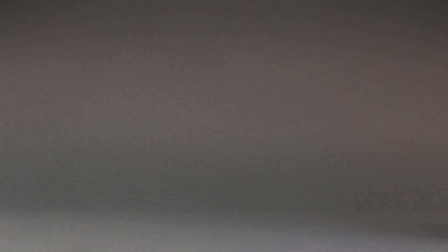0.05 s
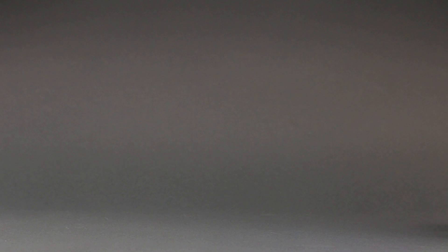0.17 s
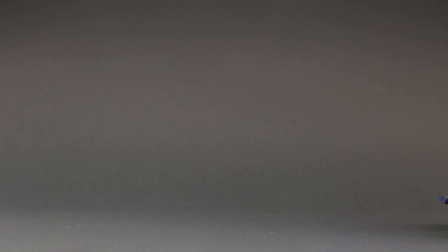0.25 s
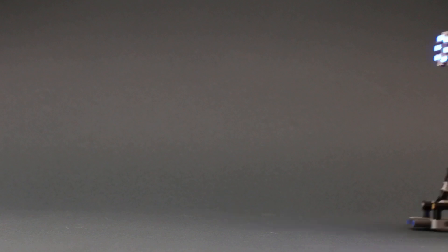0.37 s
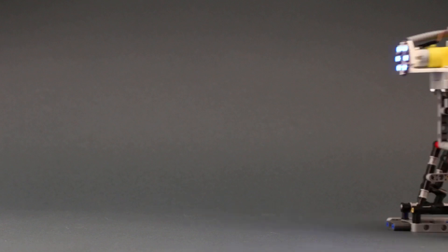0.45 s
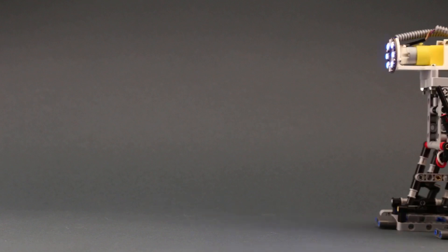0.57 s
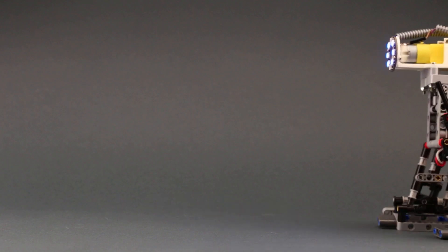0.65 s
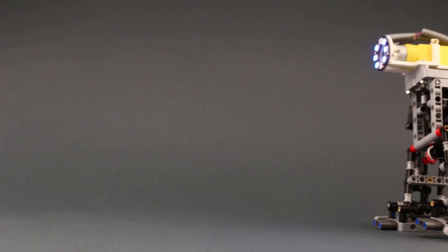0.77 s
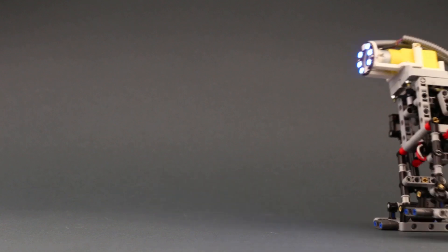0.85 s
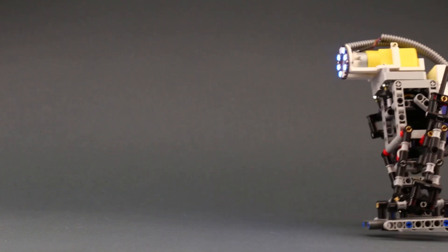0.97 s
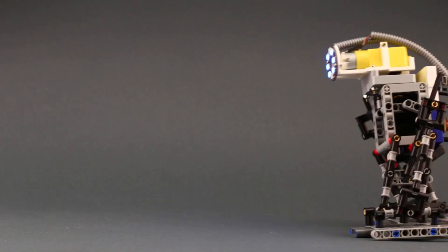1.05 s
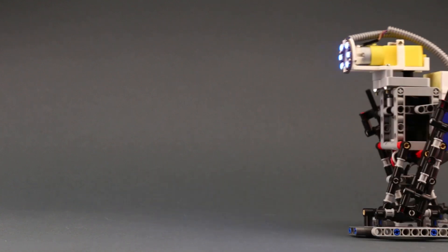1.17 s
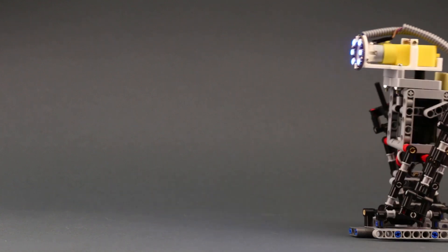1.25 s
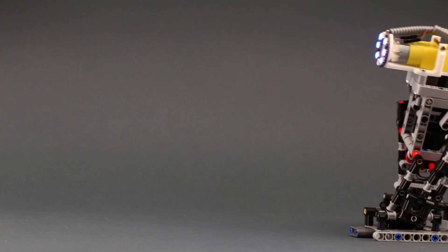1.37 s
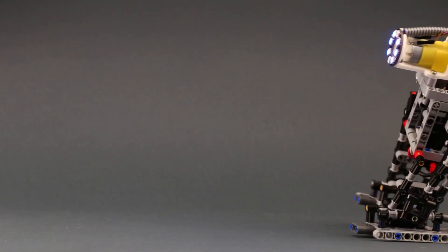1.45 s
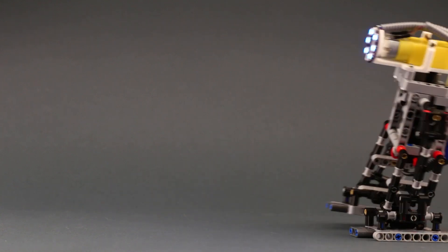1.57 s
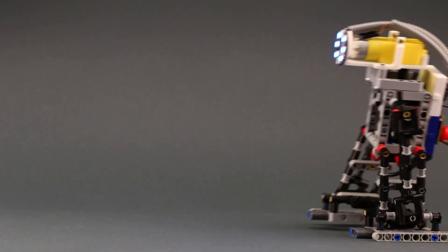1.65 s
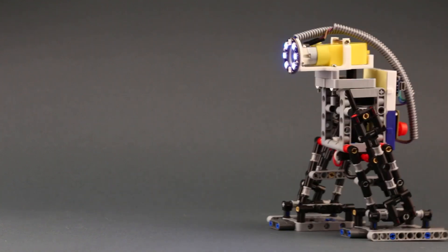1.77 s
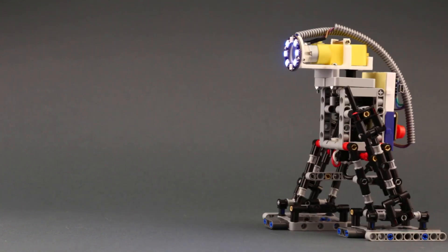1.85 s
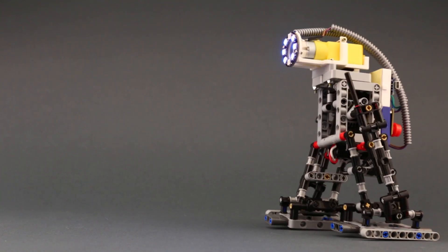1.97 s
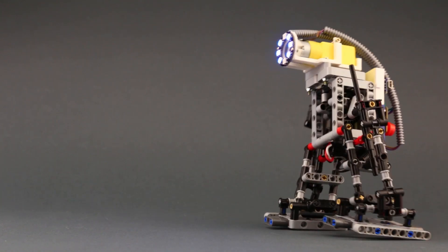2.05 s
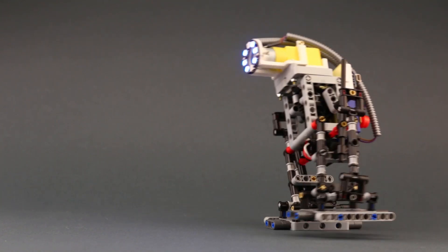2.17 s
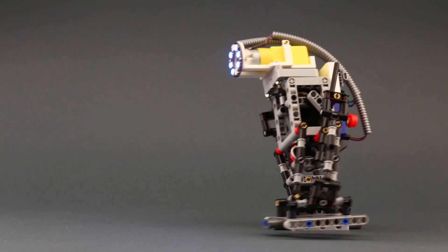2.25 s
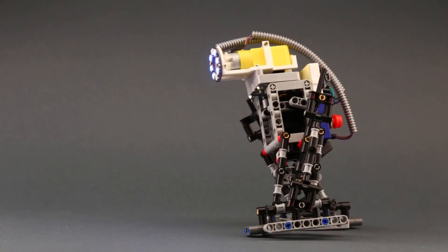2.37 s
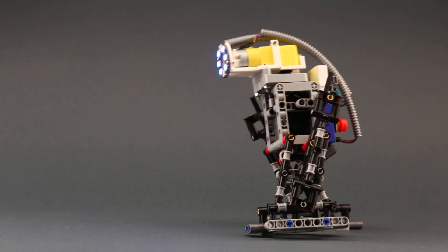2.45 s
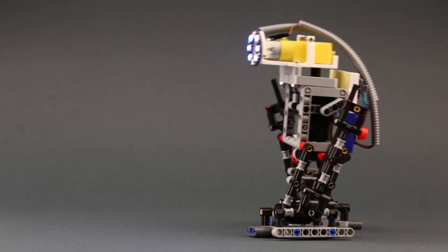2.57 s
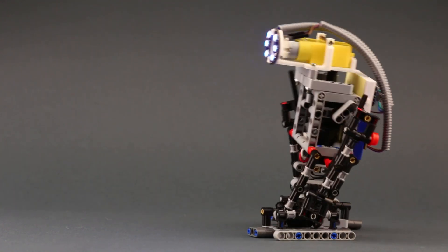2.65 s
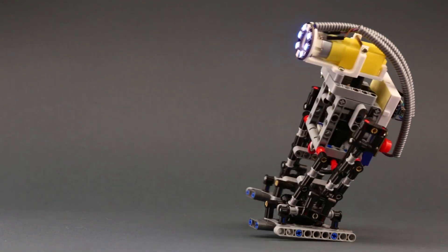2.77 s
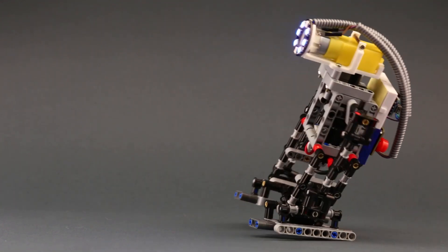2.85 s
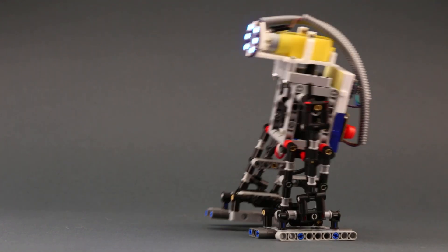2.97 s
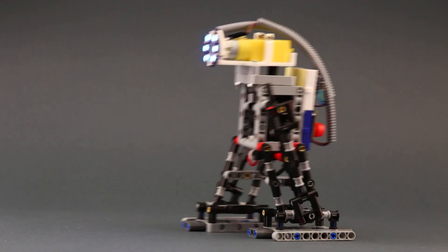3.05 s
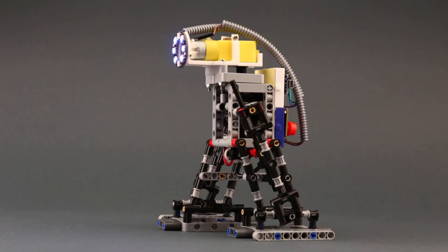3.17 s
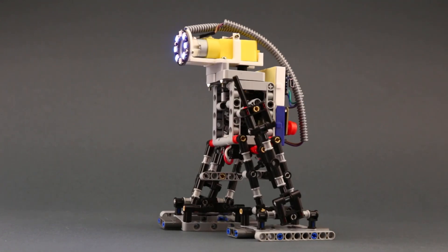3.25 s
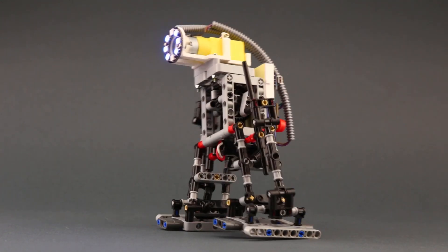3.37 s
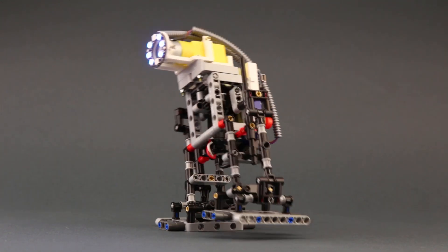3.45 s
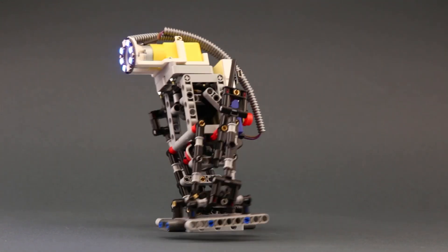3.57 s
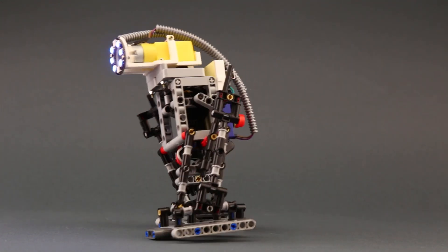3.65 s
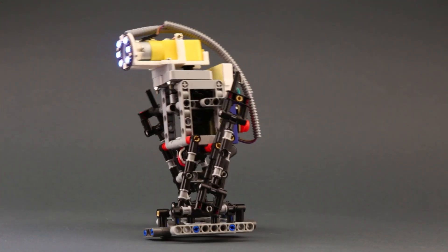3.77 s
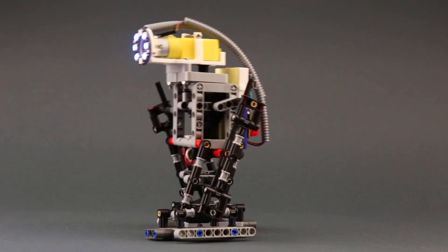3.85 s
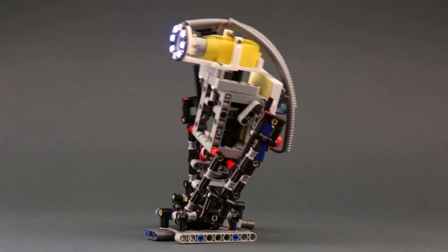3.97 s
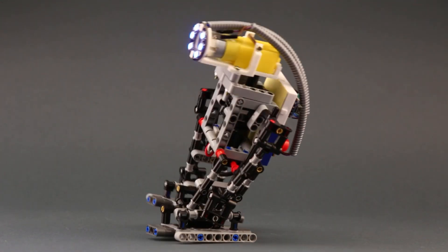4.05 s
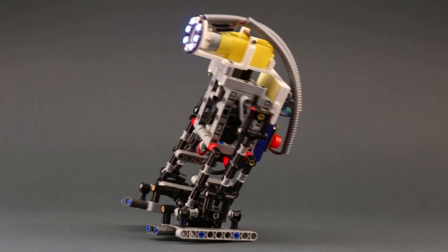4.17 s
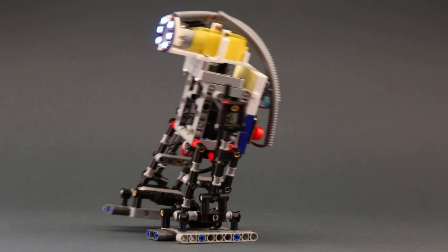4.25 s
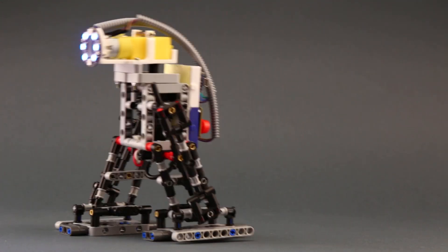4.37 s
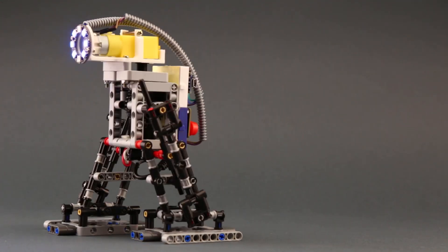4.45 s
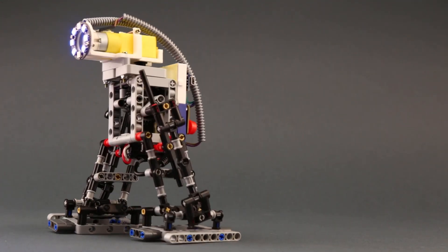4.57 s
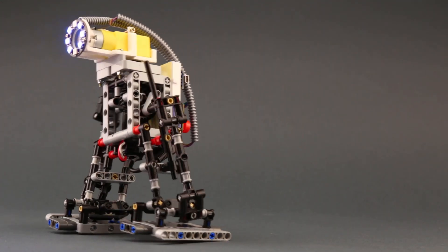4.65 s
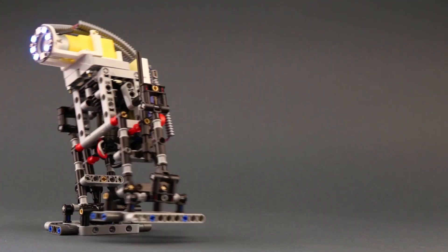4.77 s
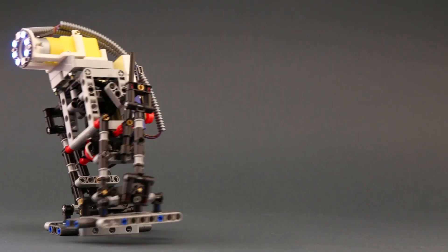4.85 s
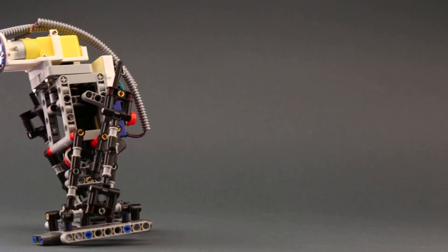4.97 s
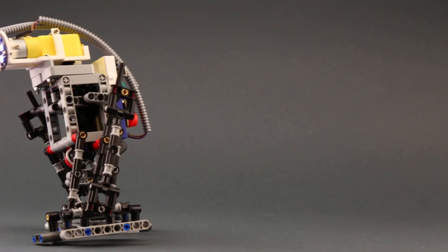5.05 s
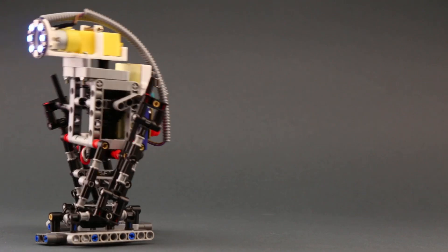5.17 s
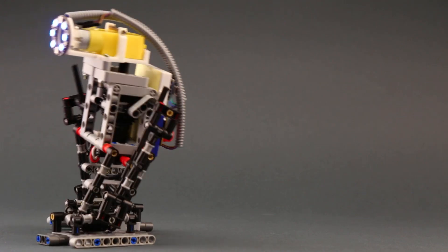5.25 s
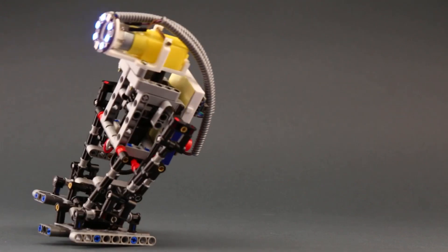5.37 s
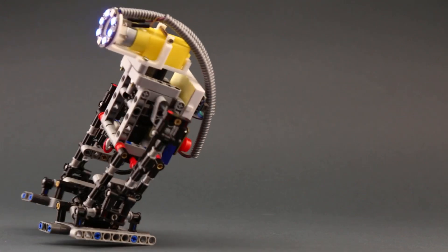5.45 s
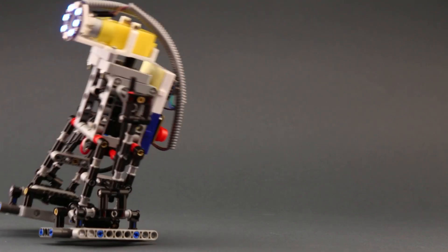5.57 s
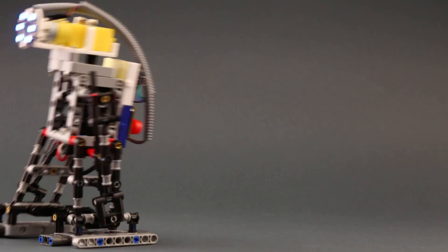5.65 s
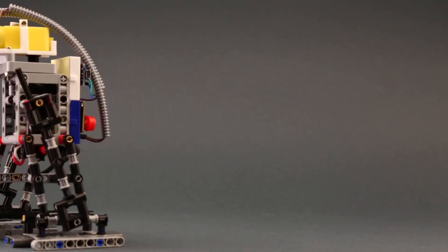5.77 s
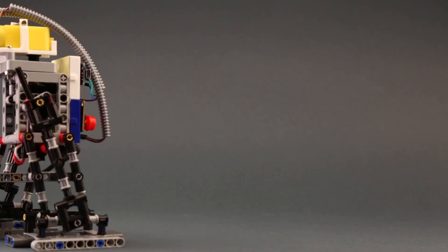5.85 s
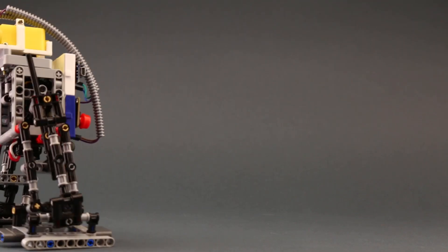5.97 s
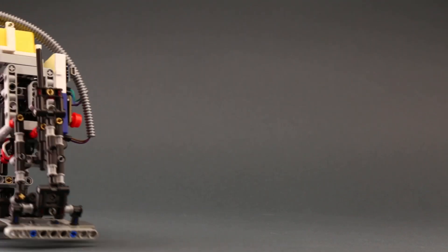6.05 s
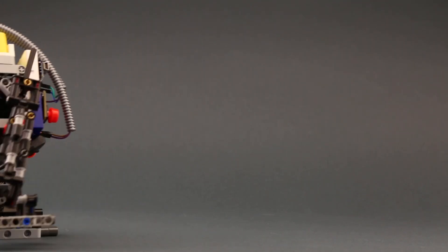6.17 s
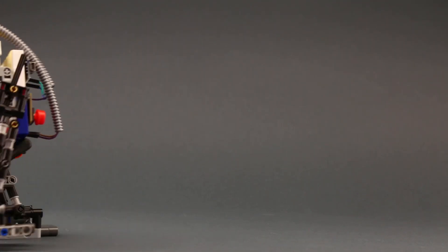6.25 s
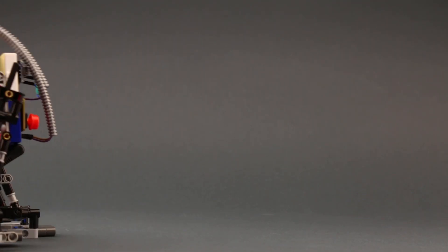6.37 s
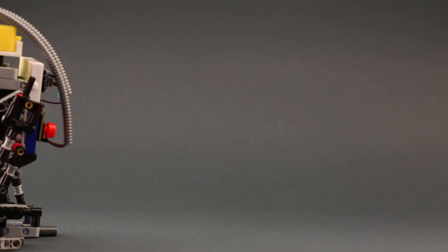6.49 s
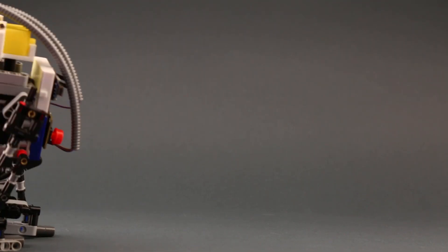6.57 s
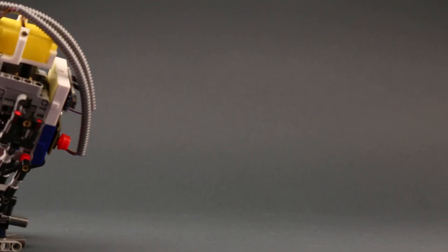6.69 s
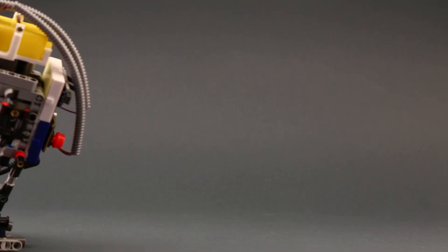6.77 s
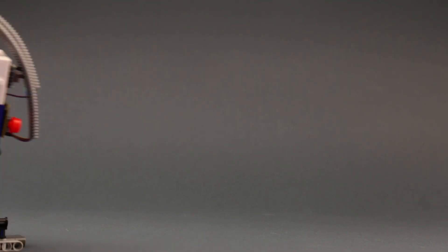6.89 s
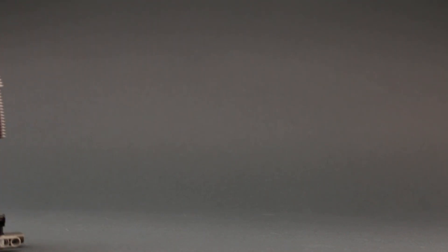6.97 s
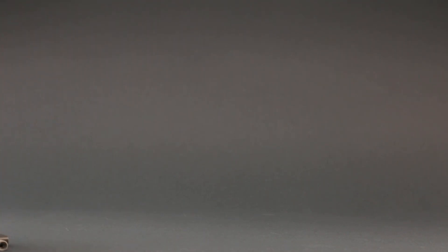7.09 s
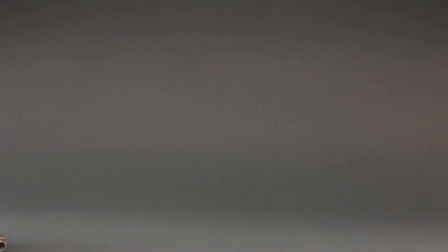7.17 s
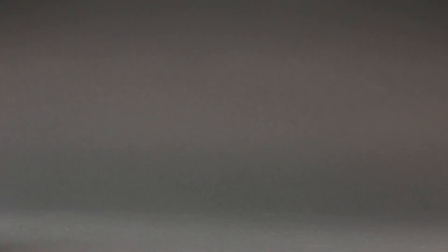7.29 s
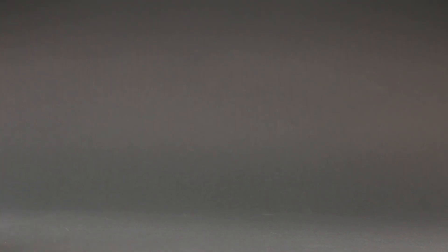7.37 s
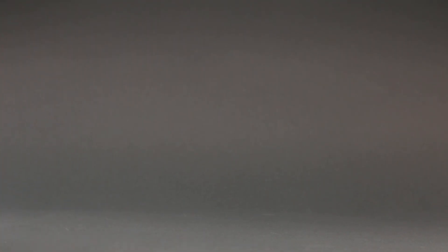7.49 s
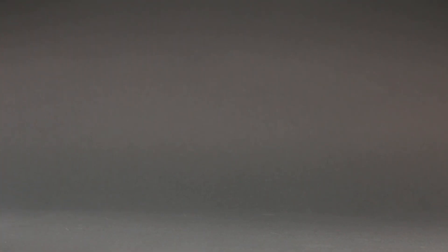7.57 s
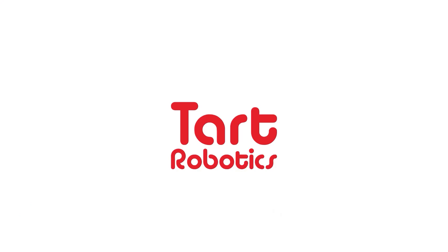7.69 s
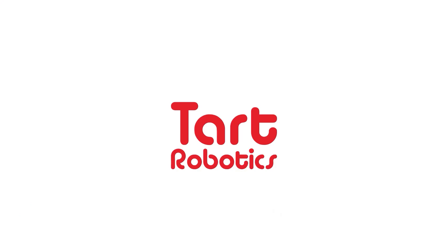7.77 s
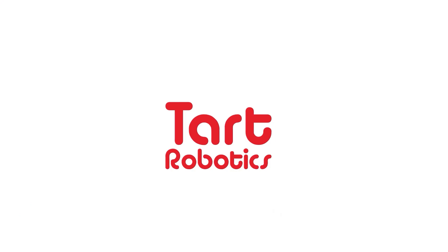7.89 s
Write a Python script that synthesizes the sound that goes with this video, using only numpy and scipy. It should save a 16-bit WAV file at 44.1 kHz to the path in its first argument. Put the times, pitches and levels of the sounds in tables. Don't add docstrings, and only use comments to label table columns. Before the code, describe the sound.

A toy walking robot made of plastic bricks passes close to the microphone on a table. Its nearly constant motor whine carries fast gear chatter, nasal plastic resonances and irregular small clicks. Each stride slightly loads the motor, bending the pitch and shifting the rattle's colour. Feet barely scrape. There is very little room sound, and both start and end are hard cuts.

```python
import sys
import numpy as np
from scipy import signal
from scipy.fft import rfft, irfft, next_fast_len
from scipy.io import wavfile
from scipy.ndimage import uniform_filter1d

SR = 44100
rng = np.random.default_rng(int(sys.argv[2]) if len(sys.argv) > 2 else 0)


def boost(x):
    u = np.asarray(x, float) / 20
    return 10 ** u


def dump_mix(stems):
    frames = np.atleast_2d(stems).T
    limited = np.clip(frames, -1, 1)
    pcm = np.round(limited * 32767).astype(np.int16)
    wavfile.write(sys.argv[1], SR, pcm)


N = 349272

START_S, TURN_S, STOP_S, WORST_BLOW_S = .1955, 6.08225, 7.6762, .9433
GEAR_RATIO, WEAR_CYCLE_TURNS = 8 / 26, 13
STRIDE_TURNS, STEP_S, INERTIA_S = 364, .76, .08
ROOM_DB = -52
SHELL_HZ, SHELL_LOW_HZ, STRUT_HZ = 6610, 5760, 4560
TOP_BAND_HZ, CEILING_HZ = 14450, 15760

# (t/s, speed/(turns per s))
SHAFT_SPEED = [(.19, 232.1), (.39, 231), (.55, 236.3), (.79, 239.6), (1.13, 231.3), (1.47, 241),
               (1.86, 231.4), (2.25, 243.6), (2.63, 234.2), (3.0, 243.6), (3.36, 232.2), (3.75, 245),
               (4.21, 235.3), (4.56, 244.3), (4.91, 234.6), (5.27, 245), (5.68, 237), (6.09, 247)]
# (pose/shaft turns, level/dB, rise/turns, fall/turns, gain per stride/dB)
HUM_POSES = [(2, -38, 16, 38, 0), (138.2, -36.5, 28, 15.6, 0.5), (194.5, -42, 8.7, 9.9, -3.5),
             (260.4, -39, 33, 32, 0)]
PINION_POSES = [(104, 2.3, 29, 49, 0), (258, 1.2, 12, 17, 0), (337, 3, 25, 46, 0)]
SEATED_POSES = [(160, 2.5, 32, 40, 0), (240, 3, 50, 50, .3), (345, 2.5, 28, 35, .5)]
FRAME_POSES = [(7, -42, 8.6, 51, 1), (107.2, -32, 28, 6.6, -0.21), (142.2, -29.5, 32, 41.4, 0),
               (197, -43, 24, 21, -1), (290, -29.5, 57.5, 39, 0.15)]
CASE_POSES = [(102.3, -31.5, 28, 61, 0.7), (209, -37, 22, 60, 1.8), (270, -34, 5, 13, 0.89),
              (342.4, -32, 37, 89, 1)]
SHELL_POSES = [(2, -30, 62, 34.5, 0.1), (69, -36, 20, 23, -1.6), (116.4, -30.5, 32, 17, -0.61),
               (210.3, -30, 26.5, 19, -0.36), (240, -28, 12, 12, 0)]
SHELL_LOW_POSES = [(30, -35.5, 51, 90, 0.5), (169, -37.5, 62, 23, -2.5), (212.4, -36.5, 33, 49, -0.5),
                   (276, -33, 11, 11, 0)]
STRUT_POSES = [(140.6, -43.5, 15, 32, 0.94)]
FEET_POSES = [(1, -56, 6, 6.7, -2), (24, -54.5, 29, 37, 0), (86, -55.5, 52, 12, 0), (153, -58, 16, 15, 0),
              (336, -75, 20, 18, 0.0047)]
# (shaft order, level/dB)
MESH_ORDERS = [(2, -60.3), (3, -60.8), (6, -51.6), (7, -58.2), (8, -52.3), (9, -60.1), (13, -56.2),
               (16, -46.5), (17, -57.0), (21, -55.3), (24, -49.7), (32, -51.6), (40, -56.5)]
# (gear order, level/dB)
GEAR_ORDERS = [(6, -83), (8, -79), (9, -68), (12, -56.5), (14, -55), (16, -59), (18, -57.5), (21, -78),
               (24, -55.5), (27, -59), (35, -87.5), (36, -51), (37, -51.5), (38, -52.5), (40, -52),
               (49, -58.5), (54, -64.5), (80, -74)]
# (shaft order, level/dB)
BRUSH_ORDERS = [(42, -57.2), (46, -59.3), (48, -55.9), (49, -48.4), (50, -52.9), (51, -54.6), (52, -53.4),
                (53, -47.4), (54, -46.6), (55, -50.6), (56, -58.4), (57, -46.5), (58, -49.9), (59, -51.0),
                (60, -66.9), (62, -55.2), (63, -60.4), (64, -60.0), (65, -64.5), (66, -62.5)]
# (position/shaft turns, blow over the rattle/dB)
WORN_TEETH = [(0.5, 14), (13.5, 3), (4, 2), (-0.5, -2), (-1, 2.5), (6, -1), (10.5, 6), (-3.5, -6.5), (9, 3)]
# (t/s, level/dB, brightness/dB)
HARD_BLOWS = [(0.6154, -10, -19), (0.6436, -15, -9), (0.656, -13, -13), (0.6702, -26, -10),
              (0.7263, -22, 10), (0.888, -23.5, -5), (0.9433, -23, -4), (0.9994, -14, -12),
              (1.1667, -22.5, 1), (1.2213, -24, 6), (1.9357, -18, -12), (2.1512, -16, -22),
              (2.535, -22, -25.5), (2.6273, -18, -11), (2.6986, -19, -24), (2.7547, -15, -12),
              (3.187, -12, -16), (3.299, -15.5, -18), (3.569, -14.5, -24), (3.898, -15, -16),
              (4.0416, -14, -18), (4.096, -9, -20), (4.5853, -19, 4), (4.766, -15, -17),
              (5.0757, -22.5, -23), (5.5748, -14, -9.5), (5.5985, -20, -24), (5.629, -29, -14.5),
              (5.667, -12, -16.5), (5.7935, -11.5, -7)]
# (f/Hz, density/(dB per Hz))
RATTLE_SPECTRUM = [(400, -25.5), (700, -22.5), (1000, -11.5), (2150, -9.5), (2700, -2.5), (3300, -3.5),
                   (3850, -5), (4700, -5), (6500, -8.5), (9000, -9), (11800, -8.5), (12700, -13),
                   (14300, -21.5), (15800, -24.5)]
# (f/Hz, density/(dB per Hz))
ROOM_SPECTRUM = [(8.8, -42), (15, -1), (49, -4), (178, -16.5), (237, -10.5), (298, -17.5), (413, -22.5),
                 (450, -18.5), (580, -48.5), (990, -120)]
# (f/Hz, width/Hz, level/dB)
HOLLOWS = [(10330, 210, -7.5), (8150, 320, 1), (13100, 180, -16)]
# (t/s, level/dB)
NEARNESS = [(.2, -3), (1.2, -2.5), (2.2, 0.5), (3.4, 0.5), (4.8, -4), (6.09, -1)]
# (t/s, brush song level/dB)
FACING = [(.2, -45.5), (1.1, -45), (1.6, -36.5), (2.3, -35), (3.8, -36), (4.9, -38.5), (5.9, -41),
          (6.09, -41)]
# (t/s, length/samples)
TIME_SKIPS = [
    (2.69, 50),
    (5.405, 128),
    (6.785, 69),
]
# (f/Hz, level/dB)
TREBLE_THRESHOLD = [(6500, -95), (8000, -72.5), (10400, -72), (12000, -72), (13500, -70), (14300, -68),
                    (15700, -69)]
# (t/s, level/dB)
TOP_BAND_LOSS = [(0, -29), (1.5, -21), (1.7, 2.5), (3.55, -5.5), (3.6, 3.5), (7.7, 2)]


def shaft_rotation():
    speed = uniform_filter1d(curves(SHAFT_SPEED)[0], size=int(INERTIA_S * SR))
    return speed, np.cumsum(speed) / SR


def motor_hum(run_turns, near_db):
    level_db = swells(run_turns, HUM_POSES, -53.5, 0.93) + .9 * near_db
    return np.sqrt(2) * boost(level_db) * np.cos(2 * np.pi * run_turns)


def brush_song(turns, slack):
    song = evened(tones(turns + .0005 * slack, BRUSH_ORDERS, 2.4, 10.5, locked=True))
    return boost(curves(FACING)[0] - 0.3) * song


def pinion_mesh(turns, run_turns, slack, drag, case_db):
    shaft_turns = turns + 0.004 * slack
    shaft = tones(shaft_turns, MESH_ORDERS[:2], 1.02, 12.)
    shaft += boost(1.1 - .55 * drag) * tones(shaft_turns, MESH_ORDERS[2:4], 1.1, 12.)
    tooth_db = swells(run_turns, PINION_POSES, -8, 3.) + .5
    shaft += boost(tooth_db) * tones(shaft_turns, MESH_ORDERS[4:5], 1.5, 16.)
    mesh_db = -2.5 + .9 * (case_db - case_db.mean())
    return shaft + boost(mesh_db) * tones(turns + .009 * slack, MESH_ORDERS[5:], 2.5, 16.)


def gear_tones(turns, run_turns, slack, drag, frame_db):
    gear_turns = turns * GEAR_RATIO + 0.0043 * slack
    low = boost(swells(run_turns, SEATED_POSES, -8, 3.)) * tones(gear_turns, GEAR_ORDERS[:4], 2.2, 25.)
    middle = boost(0.28 * drag) * tones(gear_turns, GEAR_ORDERS[4:10], 3.9, 20.5)
    high = boost(frame_db - frame_db.mean()) * tones(gear_turns, GEAR_ORDERS[10:], 1.9, 11.0)
    return low + middle + high


def gear_throb(turns):
    wobble = 2 * np.pi * (turns - .9) * GEAR_RATIO
    return np.cos(wobble) + 0.39 * np.cos(3 * wobble)


def blow(t60, rise_s):
    t = np.arange(600) / SR
    return boost(-60 * t / t60) * (1 - np.exp(-t / rise_s))


def chatter(turns, share):
    flaws, share = rng.standard_normal(600), np.clip(share, 0, 1)
    again = flaws[(turns * GEAR_RATIO % 1 * len(flaws)).astype(int) % len(flaws)]
    return np.sqrt(share) * again + np.sqrt(1 - share) * rng.standard_normal(N)


def tooth_blows(turns, throb_db, spread_db, grit_db, grit_per_s):
    grit = rng.random(N) < grit_per_s / SR
    hits = boost(grit_db + 4.4 * np.minimum(rng.exponential(1, N), 3.5)) * grit
    for turn, db in WORN_TEETH:
        at = np.flatnonzero(np.diff(np.floor((turns - turn + 0.19) / WEAR_CYCLE_TURNS)))
        hits[at] += boost(db + spread_db * rng.standard_normal(200)[:len(at)])
    envelope = boost(throb_db) + signal.oaconvolve(hits, blow(0.007, 0.0004))[:N]
    return evened(envelope * chatter(turns, 0.05))


def gear_rattle(throb, blows, near_db, case_db):
    whirr = boost(1.04 * throb) * rng.standard_normal(N)
    split = signal.butter(N=1, Wn=4000, fs=SR)
    rattle = signal.lfilter(*split, whirr) + blows - signal.lfilter(*split, blows)
    level_db = -31.5 + 0.47 * near_db + 0.043 * (case_db - case_db.mean())
    return boost(level_db) * patchy(coloured(rattle, RATTLE_SPECTRUM), 1.82)


def frame_ring(turns, speed, throb, frame_db):
    ring = resonate(chatter(turns, 0.13), 2717 + 22 * (speed - 238), 620)
    return boost(frame_db - 7.0) * patchy(boost(4.4 * throb) * ring, 1.8)


def case_ring(turns, throb, case_db):
    return boost(case_db - 9) * evened(boost(3.8 * throb) * resonate(chatter(turns, 0.052), 3815, 620))


def shell_ring(turns, run_turns, throb, near_db):
    shaken = tooth_blows(turns, 3.5 * throb, 2.2, -5., 200.)
    high_db = swells(run_turns, SHELL_POSES, -46.5, 1.67)
    low_db = swells(run_turns, SHELL_LOW_POSES, -55.5, 1.8)
    shell = boost(high_db) * evened(resonate(shaken, SHELL_HZ, 1400))
    shell += boost(low_db) * evened(resonate(shaken, SHELL_LOW_HZ, 1000))
    band = signal.butter(N=3, Wn=(5100, 7700), btype="band", fs=SR, output="sos")
    shell = signal.sosfilt(band, shell)
    return boost(.7 * near_db - .5) * np.std(shell) * patchy(shell, 1.4)


def strut_ring(run_turns, blows):
    return boost(swells(run_turns, STRUT_POSES, -63.5, 2.)) * evened(resonate(blows, STRUT_HZ, 500))


def hard_knocks():
    s, db, bright_db = np.transpose(HARD_BLOWS)
    dull, bright, at = np.zeros(N), np.zeros(N), played(s * SR).astype(int) - 25
    dull[at], bright[at] = boost(db), boost(db + bright_db)
    puff = [signal.oaconvolve(v, blow(0.0074, 0.00058))[:N] for v in (dull, bright)]
    a, b = rng.standard_normal((N, 2)).T
    ring = boost(0.1) * puff[0] * evened(resonate(a, 6580, 2100))
    return ring + boost(-4.5) * puff[1] * evened(resonate(b, 10000, 3400))


def feet(run_turns, near_db):
    level_db = swells(run_turns, FEET_POSES, -70, 1.6) + .4 * near_db
    return boost(level_db) * evened(resonate(rng.standard_normal(N), 615, 500))


def room():
    return boost(ROOM_DB) * evened(coloured(rng.standard_normal(N), ROOM_SPECTRUM))


def evened(x):
    return x / np.sqrt(np.mean(x ** 2) + 1e-20)


def played(sample):
    turn, lost = round(TURN_S * SR), 0
    for s, n in TIME_SKIPS:
        beyond_skip = (sample - s * SR) * (s - TURN_S) > 0
        same_side = (sample - turn) * (s - TURN_S) > 0
        lost = lost + n * (beyond_skip * same_side)
    return abs(sample - turn) + lost


def curves(rows):
    s, *columns = np.transpose(rows)
    return [np.interp(np.arange(N), played(s[::-1] * SR), c[::-1]) for c in columns]


def swells(turns, rows, rest_db, peaked):
    at = turns[::100]
    power = boost(2 * rest_db)
    for turn, db, rise, fall, gain_db in rows:
        away = (at - turn + STRIDE_TURNS / 2) % STRIDE_TURNS - STRIDE_TURNS / 2
        stride = (at - away) / STRIDE_TURNS - 2
        drop_db = 10 * abs(away / np.where(away < 0, rise, fall)) ** peaked
        power = power + boost(2 * (db + gain_db * stride - drop_db))
    return np.interp(turns, at, 10 * np.log10(power))


def drift(count, hz):
    knots = np.arange(0, N + SR, SR / hz)
    return [np.interp(np.arange(N), knots, row) for row in rng.standard_normal((len(knots), count)).T]


def tones(turns, orders, waver_db, hz, locked=False):
    out, sample, knots = np.zeros(N), np.arange(float(N)), np.arange(0, N + SR, SR / hz)
    wavers = waver_db * rng.standard_normal((len(knots), len(orders))).T
    for (k, db), waver, phase in zip(orders, wavers, rng.random(len(orders))):
        if locked:
            phase = k * k / 24
        angle = (2 * np.pi * ((k * turns + phase) % 1)).astype(np.float32)
        out += np.interp(sample, knots, boost(db + waver)) * np.cos(angle)
    return np.sqrt(2) * out


def coloured(x, points):
    size = next_fast_len(N)
    f, db = np.transpose(points)
    log_f = np.log(np.fft.rfftfreq(size, 1 / SR) + 1)
    return irfft(rfft(x, size) * boost(np.interp(log_f, np.log(f + 1), db)))[:N]


def resonate(x, hz, width_hz):
    turn = np.exp(2j * np.pi * np.cumsum(hz * np.ones(N)) / SR)
    r = np.exp(-np.pi * width_hz / SR)
    return (turn * signal.lfilter([(1 - r) ** 2], [1, -2 * r, r * r], x * turn.conj())).real


def patchy(x, patch_db):
    hz, s, z = signal.stft(x, SR, nperseg=512)
    patches = uniform_filter1d(rng.standard_normal(z.shape[::-1]).T, size=7, axis=0)
    patches = uniform_filter1d(patches, size=18, axis=1)
    hollow_db = sum(db * np.exp(-((hz - f) / width) ** 2) for f, width, db in HOLLOWS)
    z = z * boost(patch_db * evened(patches) + hollow_db[:, None])
    return evened(signal.istft(z, nperseg=512)[1][:N])


def thinned(x):
    hz, s, z = signal.stft(x, SR, nperseg=1024, noverlap=768)
    power = uniform_filter1d(uniform_filter1d(abs(z) ** 2, size=4, axis=0), size=7, axis=1)
    flicker_db = 1.7 * rng.standard_normal(len(s))[np.arange(len(s)) // 6]
    top_db = np.interp(s, *np.transpose(TOP_BAND_LOSS)) + flicker_db
    limit_db = np.interp(hz, *np.transpose(TREBLE_THRESHOLD))[:, None] + np.outer(hz > TOP_BAND_HZ, top_db)
    kept = (power > boost(2 * limit_db)) & (hz < CEILING_HZ)[:, None]
    return signal.istft(z * kept, nperseg=1024, noverlap=768)[1][:N]


def scene():
    speed, run_turns = shaft_rotation()
    turns = run_turns - run_turns[int(played(WORST_BLOW_S * SR))]
    drag = uniform_filter1d(speed, size=int(STEP_S * SR)) - speed
    near_db = curves(NEARNESS)[0]
    frame_db = swells(run_turns, FRAME_POSES, -45, 3.1) + 1.4 * near_db
    case_db = swells(run_turns, CASE_POSES, -49, 4.0) + 1.4 * near_db
    shaft_slack, gear_slack = drift(count=2, hz=59.17)
    throb = gear_throb(turns)
    blows = tooth_blows(turns, 1.0 * throb, 0.98, -1.5, 160.0)

    mix = motor_hum(run_turns, near_db) + brush_song(turns, shaft_slack)
    mix += pinion_mesh(turns, run_turns, shaft_slack, drag, case_db)
    mix += gear_tones(turns, run_turns, gear_slack, drag, frame_db)
    mix += gear_rattle(throb, blows, near_db, case_db)
    mix += frame_ring(turns, speed, throb, frame_db) + case_ring(turns, throb, case_db)
    mix += shell_ring(turns, run_turns, throb, near_db) + strut_ring(run_turns, blows)
    mix += hard_knocks() + feet(run_turns, near_db) + room()
    return mix[None]


def low_pass(x):
    return signal.sosfilt(signal.butter(12, 16720, fs=SR, output="sos"), x)


def record(dry):
    sample = np.arange(N)
    heard = (sample > START_S * SR) & (sample < STOP_S * SR)
    run = dry[0, played(sample).astype(int)]
    finished = (thinned(run) * heard)[None]
    return low_pass(finished)


dry = scene()
out = record(dry)
dump_mix(out)
```